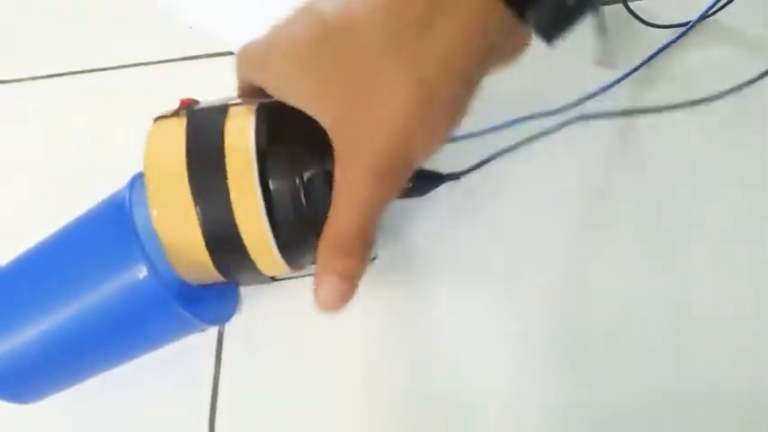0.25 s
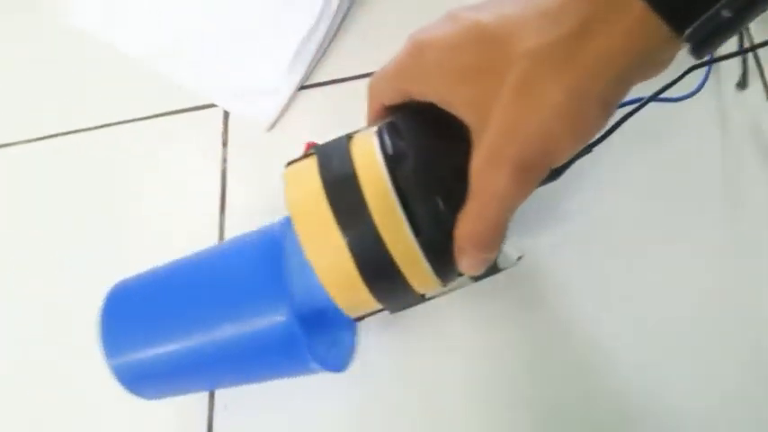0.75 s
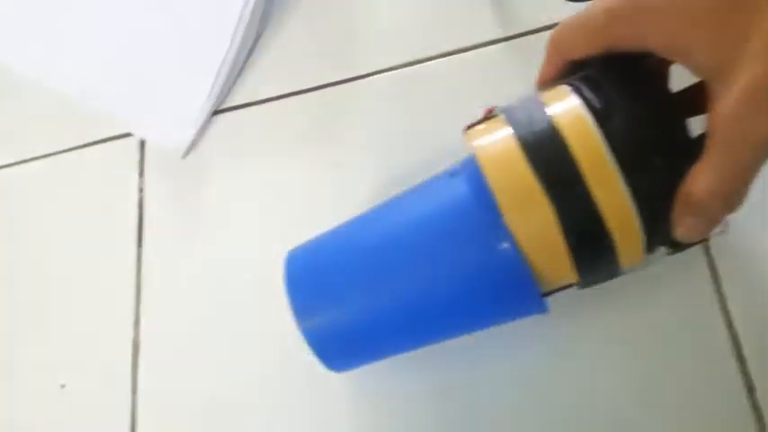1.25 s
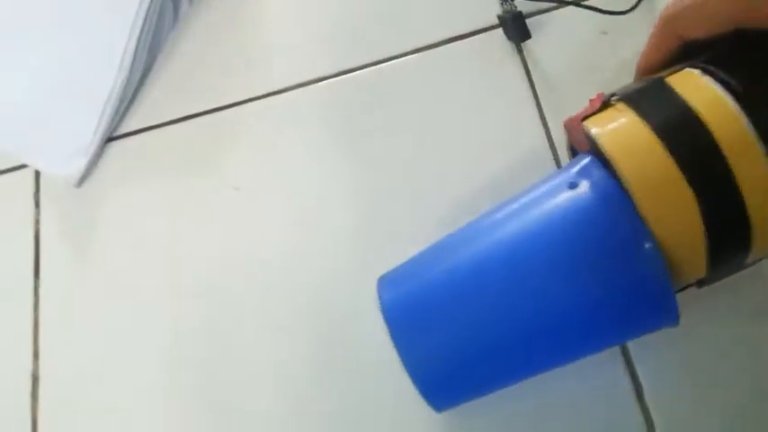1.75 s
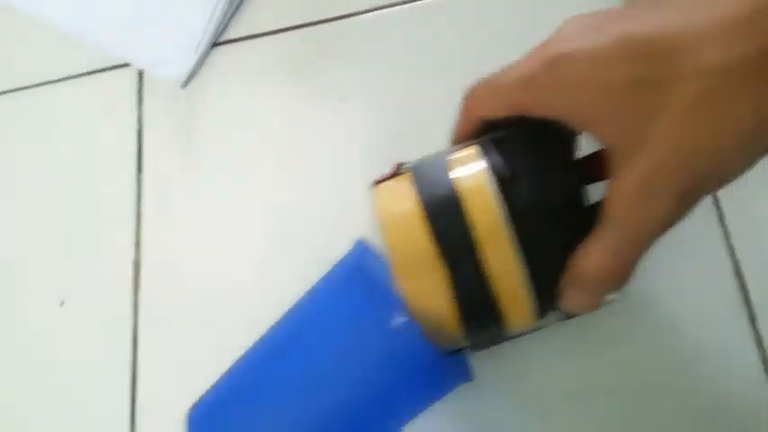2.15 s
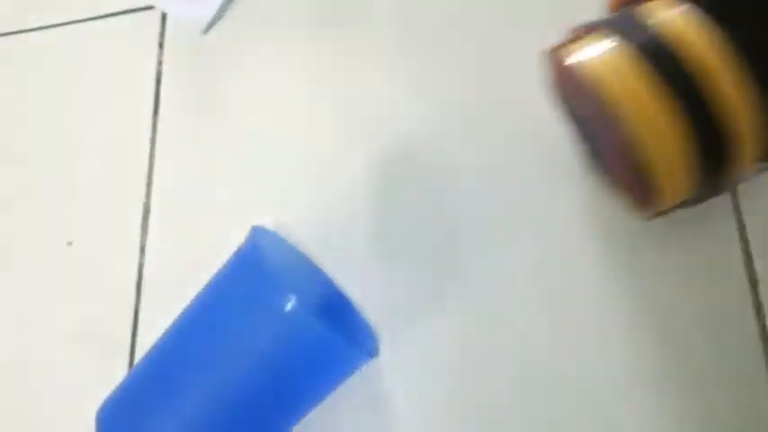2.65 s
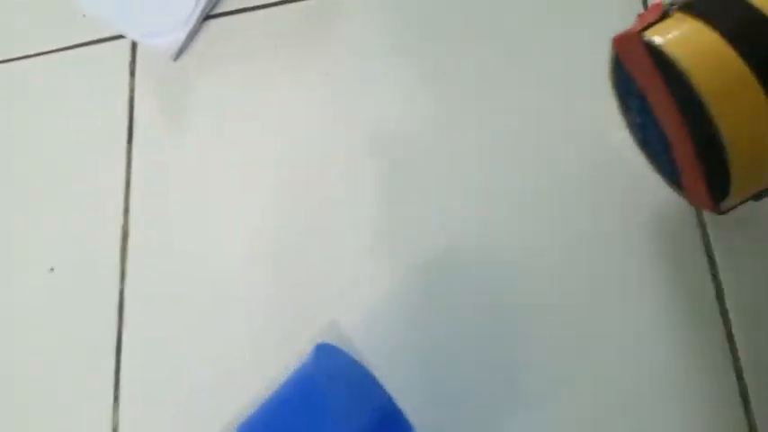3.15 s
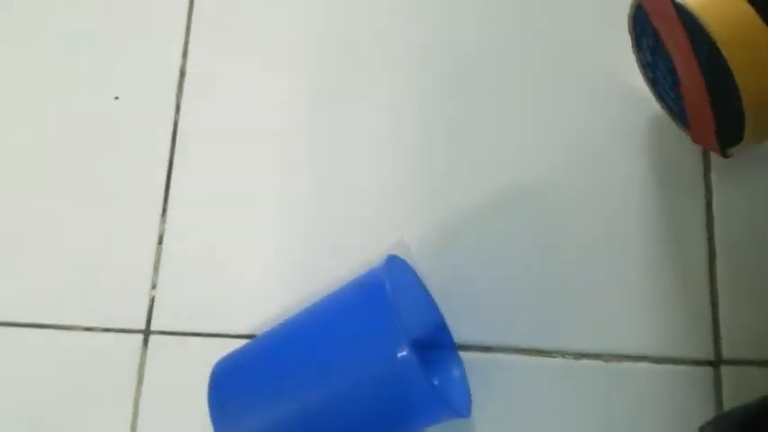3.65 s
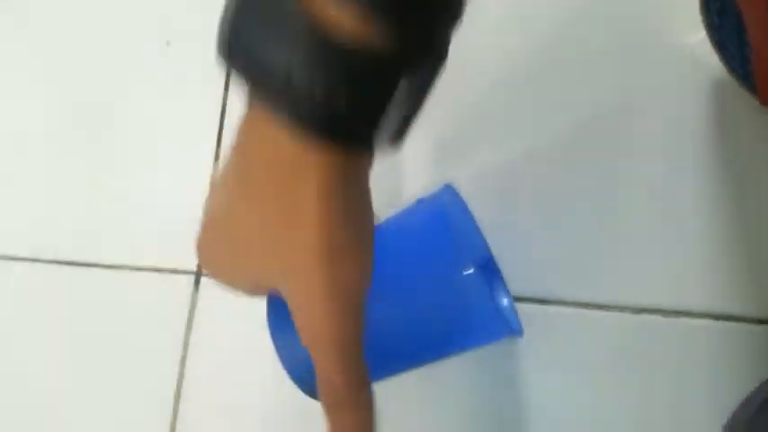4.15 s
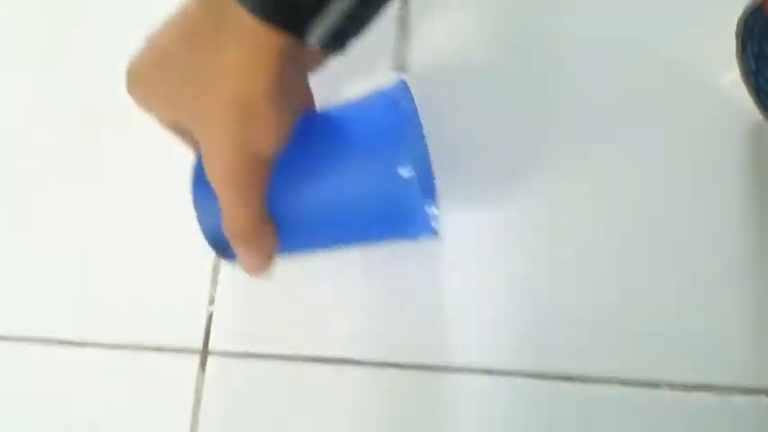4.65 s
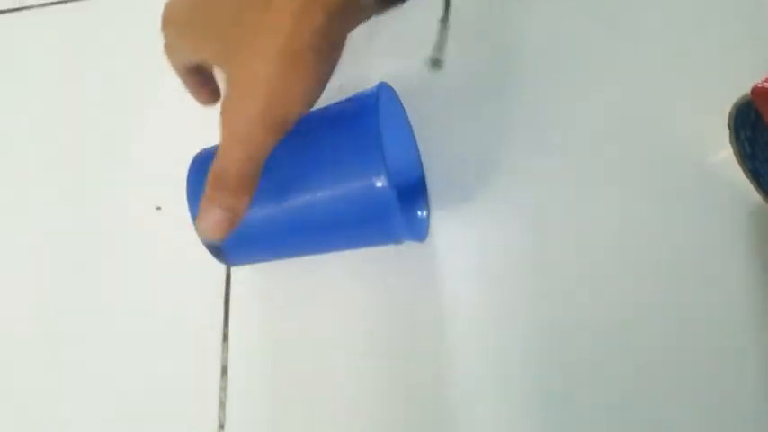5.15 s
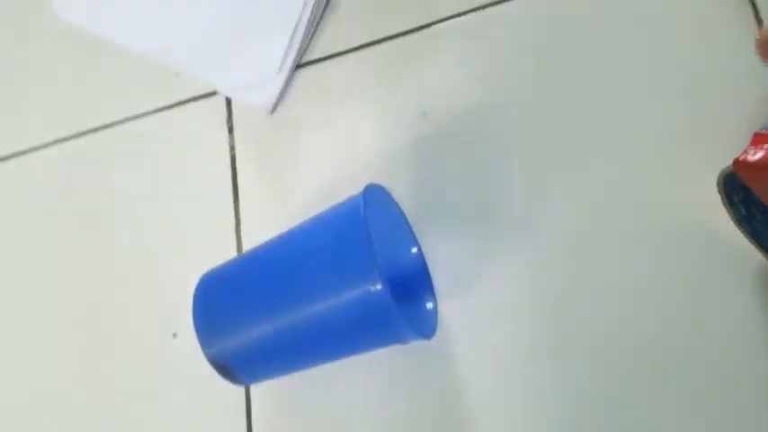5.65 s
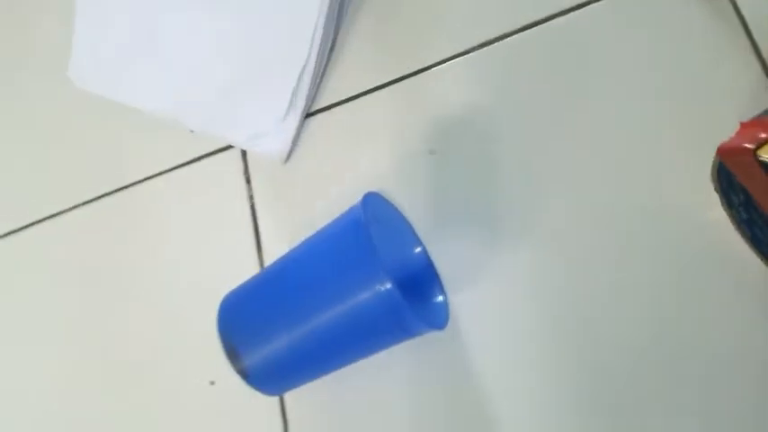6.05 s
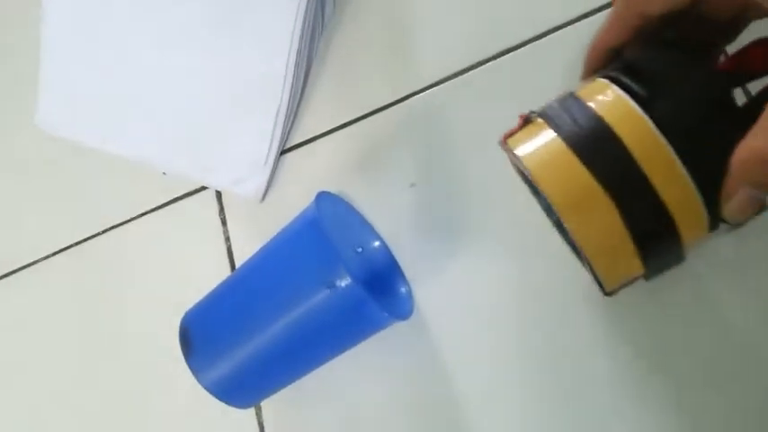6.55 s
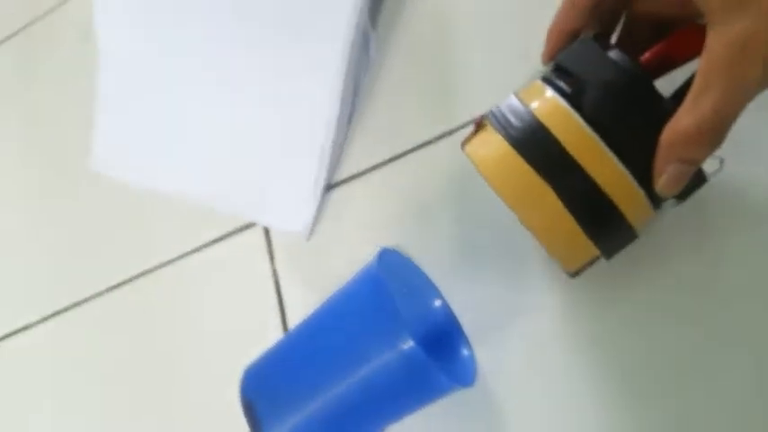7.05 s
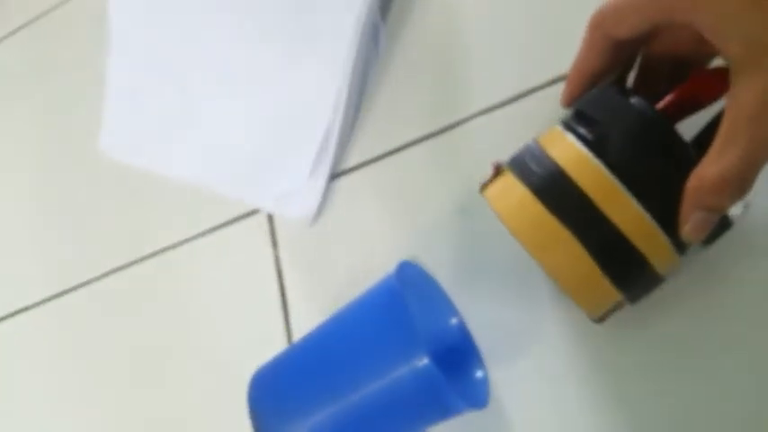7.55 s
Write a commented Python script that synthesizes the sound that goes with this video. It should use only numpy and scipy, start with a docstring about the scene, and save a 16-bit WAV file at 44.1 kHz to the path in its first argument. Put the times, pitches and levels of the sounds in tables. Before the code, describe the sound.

A small electric ducted fan runs very close to a stereo microphone. At first a plastic cup at its mouth makes a loud, rough, hollow double note that swells, dips and distorts into crackling treble. Just before three seconds the notes vanish, leaving fluttering turbulent air with shifting whistly resonances. A tiny bright tick sounds on the right shortly after four seconds. Near the end a strong high whine comes forward, mostly on the right, over a tiled floor.

```python
"""A small ducted fan is swept by hand over a tiled floor, close to a two-port microphone.
It starts with a plastic cup at its mouth: a loud hollow pair of notes that overloads the input into crackling treble.
Just before 3 s the notes die away and leave turbulent air blowing through the resonances of the housing.
A short bright tick follows at 4.25 s, and a strong whine near 3 kHz comes forward on the right after 6.4 s.
Throughout, the resonances swell and fade at each port as fan and microphone turn, and the port delay shifts."""
import sys
import numpy as np
from scipy import signal
from scipy.fft import rfft, irfft, next_fast_len
from scipy.io import wavfile
from scipy.ndimage import uniform_filter1d, minimum_filter1d, map_coordinates

SR = 44100
rng = np.random.default_rng(int(sys.argv[2]) if len(sys.argv) > 2 else 0)


def to_wav(s):
    """Save 16-bit WAV."""
    ch = np.atleast_2d(s).T  # columns
    pcm = np.round(np.clip(ch, -1, 1) * 32767)  # PCM
    wavfile.write(sys.argv[1], SR, pcm.astype(np.int16))


N = 344862

# Table levels set each layer ahead of treble roll-off, puffs, crackle and input overload.
# Lowest housing resonance, moving as the fan leaves the cup and is tilted. Each row: time in seconds,
# left centre in Hz, right centre in Hz, left level in dB, right level in dB, width in Hz.
RUMBLE_TRACK = [(0, 285, 350, -33, -25, 200), (.3, 290, 355, -25.5, -16.5, 200),
                (.7, 290, 326, -25.5, -21.5, 200), (.9, 300, 346, -21.5, -16, 200),
                (1.3, 315, 327, -18.5, -16, 200), (2, 340, 370, -18.5, -14, 220),
                (2.3, 344, 383, -23.5, -16.5, 200), (2.55, 327, 350, -25, -18.5, 200),
                (2.8, 300, 297, -25.5, -23.5, 200), (3.5, 300, 310, -27, -22, 200),
                (4.4, 290, 294, -24.5, -23.5, 161), (5.3, 300, 360, -24.5, -23.5, 221),
                (5.85, 287, 300, -29.5, -24.5, 220), (6.15, 267, 262, -27, -24, 120),
                (6.6, 268, 260, -30, -22, 120), (7, 263, 259, -26, -23.5, 109),
                (7.82, 256, 252, -25, -23.5, 109)]
# Second lowest resonance. Each row: time in seconds, left and right centre in Hz, left and right level in dB.
HOLLOW_TRACK = [(0, 500, 495, -17, -21), (.5, 497, 494, -21, -24), (.65, 487, 494, -37, -39),
                (.95, 496, 473, -13, -18.5), (1.4, 495, 470, -20, -22), (2, 470, 465, -18, -20),
                (2.4, 480, 472, -22, -20), (2.8, 503, 474, -37, -32), (3.4, 460, 437, -30, -36),
                (4.4, 550, 458, -28.5, -29.5), (5.4, 565, 636, -28, -30), (6.1, 656, 690, -26.5, -26),
                (7, 700, 700, -29, -26.5), (7.82, 684, 734, -33, -27.5)]
# The open tube's note, with its top apart at the two ports. Each row: time in seconds,
# left and right centre in Hz, left and right level in dB.
TUBE_TRACK = [(0, 970, 970, -36, -25), (.5, 950, 960, -22, -27), (.75, 990, 960, -27, -32),
              (.95, 955, 910, -22.5, -34), (1.1, 980, 890, -38, -28), (1.5, 990, 860, -41, -17),
              (1.9, 886, 840, -29, -20.5), (2.15, 945, 900, -21, -15), (2.4, 930, 890, -19, -22),
              (2.65, 980, 930, -20, -32), (2.95, 975, 914, -30.5, -22), (3.8, 790, 904, -30, -24.5),
              (4.9, 790, 870, -28.5, -21), (5.5, 925, 885, -27, -26), (5.9, 960, 860, -24, -22),
              (6.25, 950, 850, -28.5, -26.5), (6.5, 934, 790, -27.5, -27.5), (7.82, 936, 810, -24.5, -26.5)]
# Body resonance. Each row: time in seconds, centre in Hz, left level in dB, right level in dB.
BODY_TRACK = [(0, 1540, -29.5, -34), (1.4, 1494, -31, -27.5), (2, 1450, -29, -21), (2.5, 1170, -22, -33),
              (2.9, 1490, -29.5, -28), (3.3, 1380, -25.5, -27.5), (3.8, 1450, -27, -30),
              (4.1, 1400, -25, -24.5), (4.6, 1410, -23, -25), (5.2, 1360, -22.5, -22),
              (5.7, 1620, -24.5, -23.5), (6.3, 1220, -29.5, -32.5), (7.82, 1310, -25, -28)]
# Duct resonance. Each row: time in seconds, centre in Hz, left level in dB, right level in dB.
DUCT_TRACK = [(0.0, 2030, -26.0, -36), (0.33, 1780, -20.5, -19), (0.57, 2020, -33, -34),
              (0.93, 1800, -28, -24.5), (1.29, 1890, -30, -22.5), (1.65, 1950, -28, -30),
              (2.22, 2050, -32.5, -23.5), (2.46, 1900, -36, -38), (2.76, 1990, -28, -17.5),
              (2.97, 2070, -31, -29.5), (3.24, 2010, -35, -20.5), (3.4, 1930, -29, -23),
              (3.54, 1830, -28, -23.5), (3.81, 1720, -32, -22), (3.97, 1800, -36, -28),
              (4.12, 1820, -41, -21.5), (4.4, 1810, -32, -24.5), (4.7, 1710, -27, -21.5),
              (4.95, 1930, -32, -25), (5.15, 1940, -32, -23.5), (5.3, 1830, -26, -24),
              (5.48, 1940, -32, -16.5), (5.62, 1780, -33, -27), (5.79, 1980, -21, -13.5),
              (5.92, 2000, -23, -18), (6.2, 1950, -25, -15.5), (6.4, 1990, -24, -15.5),
              (6.52, 1910, -25, -21), (6.7, 2000, -26, -21), (6.95, 1960, -26, -22),
              (7.8, 1980, -30, -26.5)]
# Throat resonance. Each row: time in seconds, centre in Hz, left level in dB, right level in dB.
THROAT_TRACK = [(0.0, 2270.0, -36, -25), (0.21, 2390, -36, -38), (0.45, 2710, -22, -27.5),
                (0.78, 2430, -42, -26), (1.0, 2600, -34, -19.5), (1.23, 2620, -27.5, -24),
                (1.36, 2600, -25, -22), (1.5, 2610, -26, -18), (1.71, 2300.0, -26.5, -28),
                (2.07, 2480, -25, -18), (2.46, 2280, -26.5, -32), (2.67, 2580, -25, -27),
                (2.97, 2500, -36, -27), (3.27, 2190, -29.5, -20.5), (3.5, 2300, -31, -24.5),
                (3.7, 2600, -29, -21.5), (3.9, 2740, -31, -21.5), (4.08, 2650, -31, -27),
                (4.32, 2420, -34, -39), (4.47, 2300, -32.0, -30), (4.74, 2620, -29, -30.5),
                (4.95, 2650, -38, -23), (5.2, 2550, -28, -23.5), (5.38, 2440, -30, -21),
                (5.5, 2430, -25, -19), (5.62, 2420, -29, -20.5), (5.75, 2420, -28, -18.5),
                (5.9, 2300, -32, -21.5), (6.02, 2300, -36, -16.5), (6.18, 2270, -38, -15),
                (6.39, 2030, -21, -18.5), (6.57, 2230, -29, -25), (6.75, 2270, -28, -22.5),
                (7.8, 2430, -22, -18.5)]
# Whining resonance near 3 kHz. Each row: time in seconds, left and right centre in Hz,
# left and right level in dB, width in Hz.
WHINE_TRACK = [(0, 2900, 2850, -28, -38, 393), (.15, 2900, 2900, -29.5, -31, 350),
               (.33, 2940, 2870, -26, -19.5, 320), (.51, 2930, 2880, -31, -26.5, 300),
               (.72, 2900, 3020, -26, -18.5, 200), (.93, 2870, 2970, -22, -25.5, 350),
               (1.12, 2920, 2820, -28, -16.5, 375), (1.22, 2920, 2720, -21, -9.5, 450),
               (1.3, 2980, 2920, -25, -7.5, 280), (1.45, 3070, 2890, -31, -11.5, 260),
               (1.59, 3070, 2880, -29, -20, 260), (1.83, 3320, 2980, -26, -22.5, 300),
               (2.07, 2900, 2910, -30, -18, 340), (2.22, 2840, 2870, -29, -17.5, 320),
               (2.49, 3100, 2850, -26, -19.5, 300), (2.76, 3100, 2860, -29, -12.5, 340),
               (3.06, 3100, 2970, -26, -23, 380), (3.36, 3080, 2980, -31, -18, 240),
               (3.63, 3100, 2880, -26, -16, 280), (3.84, 2900, 2820, -48, -20, 380),
               (4.02, 2870, 2880, -43, -13, 220), (4.35, 3010, 2900, -40, -20.5, 193),
               (4.53, 3070, 2930, -30, -15.5, 190), (4.68, 2930, 2930, -40, -26, 220),
               (5.0, 3000, 2800, -34, -19.5, 280), (5.25, 2890, 2800, -37, -18, 350),
               (5.4, 2830, 2740, -27, -21, 400), (5.47, 2840, 2660, -23, -16, 420),
               (5.58, 2830, 2720, -23, -14, 380), (5.7, 2920, 2760, -21.5, -21, 300),
               (5.85, 2830, 2820, -25, -26, 300), (6, 2830, 2830, -25, -28, 400),
               (6.15, 2830, 2850, -30, -40, 400), (6.29, 3060, 3040, -26, -18, 300),
               (6.41, 3150, 3070, -29, -21.5, 340), (6.5, 3170, 3130, -20, -12.5, 400),
               (6.6, 3150, 3080, -21, -15, 400), (6.75, 3130, 3035, -21, -11.5, 395),
               (7.17, 3050, 2990, -18.5, -10.5, 330), (7.35, 3010, 2950, -20, -12.5, 307),
               (7.8, 3000, 2930, -22, -14, 282)]
# Rim resonance. Each row: time in seconds, centre in Hz, left level in dB, right level in dB.
RIM_TRACK = [(0, 3700, -35, -28), (.6, 3550, -29.5, -27), (.92, 4040, -28, -21.5), (1.1, 4230, -34, -26),
             (1.35, 4250, -38, -27.5), (1.6, 3120, -24, -28.5), (2.2, 4130, -32, -26.5),
             (2.65, 3750, -37, -23.5), (3, 3850, -30, -40), (3.6, 3830, -35.5, -34),
             (4.4, 4000, -33.5, -35.5), (5.3, 3900, -29, -26), (5.6, 4000, -33, -29.5),
             (6.15, 4000, -30.5, -41), (6.5, 3100, -32, -31.5), (7.82, 3130, -31, -25)]
# Grille resonance. Each row: time in seconds, centre in Hz, left level in dB, right level in dB.
GRILLE_TRACK = [(0.0, 4380, -32, -34), (0.33, 4380, -32.5, -25), (0.54, 4740, -34, -40),
                (0.66, 4920, -34, -23.5), (0.8, 4900, -31, -19), (0.9, 4700, -31, -27),
                (1.02, 4370, -32.0, -34), (1.12, 4650, -37, -25), (1.26, 4700, -34, -23),
                (1.47, 4440, -35.5, -32.5), (1.8, 4960, -44, -28.5), (1.95, 5040, -40, -34),
                (2.22, 4530, -29, -30), (3.09, 4510, -34.5, -32.5), (3.81, 4430, -38, -32),
                (4.2, 4700, -43, -18), (4.5, 4710, -31, -24.5), (4.68, 4600, -49, -23.5),
                (4.86, 4560, -29, -34), (5.07, 4760, -31, -36), (5.43, 4350, -36.0, -42),
                (5.67, 4400, -52, -34), (6.38, 4260, -31, -29.5), (6.5, 4600, -31, -24),
                (6.66, 4500, -26, -23.5), (6.99, 4570, -27, -18.5), (7.56, 4590, -33, -23.5),
                (7.8, 4600, -33.0, -23.5)]
# Close pair of high modes. Each row: time in seconds, lower mode's left and right level in dB,
# upper mode's left and right level in dB.
EDGE_TRACK = [(0.0, -45, -54, -45.0, -23.5), (0.39, -35, -23, -40.5, -29.5), (0.66, -48, -39, -55, -39),
              (0.93, -32, -27, -47, -47), (1.14, -47, -46, -40, -38.0), (1.35, -39, -33, -40.5, -33),
              (1.62, -38, -39.0, -46, -38), (2.28, -35, -44, -46, -34.0), (2.49, -34.0, -22.5, -52, -31),
              (2.73, -40, -37, -36, -35), (2.88, -36, -25.5, -32, -30), (3.09, -28, -33, -40, -35),
              (3.3, -32, -30, -40, -27.5), (3.62, -34, -37, -36, -30.5), (3.93, -36, -40, -41, -34),
              (4.32, -39, -25, -34.5, -24), (4.71, -45, -29, -36, -28.5), (5.01, -34, -31, -40, -29.0),
              (5.3, -31, -26, -40, -30), (5.55, -31, -28, -39, -32), (5.73, -34, -27, -44, -31.5),
              (6.09, -34, -39, -44, -37), (6.39, -35, -29, -39.5, -32.5), (6.66, -39.5, -50, -37, -37),
              (7.8, -36, -40, -48, -33.5)]
# The cup's two notes. Each row: time in seconds, low note in Hz, low note's left and right level in dB,
# high note's left and right level in dB.
CUP_TRACK = [(0, 686, -15, -22, -23, -15), (.07, 680, -15, -17, -15, -14.5),
             (.16, 660, -14, -13, -12.5, -11), (.3, 676, -8.5, -7, -11, -15),
             (.4, 710, -14, -11, -8, -10.5), (.52, 700, -20, -14.5, -14, -15),
             (.6, 660, -31, -33, -21, -21), (.72, 640, -50, -45, -31, -30), (.8, 600, -21, -18, -24, -20.5),
             (.88, 600, -20, -18, -11, -11.5), (1.0, 597, -17, -15, -12.5, -9),
             (1.09, 585, -14.5, -14, -25, -21), (1.25, 630, -12.5, -8.5, -24, -16),
             (1.4, 636, -9, -6, -17, -10.5), (1.6, 660, -9.5, -8.5, -19, -21),
             (1.85, 595, -5, -6, -17.5, -10), (2.0, 574, -6, -8, -12, -10),
             (2.12, 600, -4.5, -4.5, -25, -10.5), (2.28, 656, -11, -10.5, -14, -10.5),
             (2.4, 646, -19, -16, -6, -7.5), (2.54, 600, -13, -14, -19, -11),
             (2.66, 597, -19.5, -24.5, -32, -19), (2.82, 625, -50, -46, -50, -48),
             (3.05, 620, -51, -51, -65, -44)]
# Delay of the right port behind the left. Each row: time in seconds, lag in microseconds (negative: earlier).
PORT_LAG = [(0, 168), (.45, 155), (1, 107), (1.4, 28), (1.8, -1), (2.05, 18), (2.45, 159), (2.9, -51),
            (4.5, -48), (5.2, -66), (5.7, -25), (6.2, -2), (6.7, 50), (7.82, 48)]
# Broad rush of air. Each row: time in seconds, left level in dB, right level in dB.
RUSH_LEVELS = [(0, -28, -28), (1.1, -34.5, -31.5), (1.8, -30.5, -23.5), (2.6, -27.5, -28.5),
               (3, -34, -30.5), (3.8, -28, -27), (4.6, -28.5, -28), (5.3, -31, -28.5), (6, -28, -27.5),
               (6.6, -26.5, -28), (7.3, -25.5, -26), (7.82, -26, -25)]
# Colour of the rush. Each row: frequency in Hz, relative level in dB per Hz.
RUSH_SPECTRUM = [(20, -20), (40, -2), (60, 0), (110, 6.5), (200, -1.5), (500, -2.5), (1500, -54),
                 (3500, -39), (6000, -18)]
# Likeness of the rush at the two ports. Each row: frequency in Hz, correlation from 0 to 1.
RUSH_ALIKE = [(100, 0.94), (1000, 0.17), (4000, 0.12)]
# Steep treble fall of the roar. Each row: frequency in Hz, gain in dB.
ROAR_ROLLOFF = [(20, -1), (5900, -0.45), (6300, -2), (6700, -11.5), (7500, -61), (16000, -43)]
# Treble of the overloaded input. Each row: time in seconds, left level in dB, right level in dB.
OVERLOAD_LEVELS = [(0.8, -77, -68), (0.88, -47, -40), (1.05, -62, -48), (1.11, -69, -73), (1.16, -56, -38),
                   (1.45, -49, -34), (1.6, -44, -39), (2.0, -43, -39), (2.1, -58, -35.5),
                   (2.42, -69, -37.5), (2.55, -70, -65), (2.7, -80, -78)]
# Colour of the overload treble. Each row: frequency in Hz, relative level in dB.
OVERLOAD_SPECTRUM = [(5500, -28), (6600, 6.0), (10000, -0.5), (15000, -6.0), (15300, -34)]
# Fine hiss of the jet. Each row: time in seconds, left level in dB.
HISS_LEVELS = [(0, -55.5), (.37, -46), (.9, -54), (1.5, -45), (2.6, -45), (3, -41), (5.2, -40.5),
               (5.95, -46.5), (6.4, -43.5), (7.82, -46)]
# Colour of the hiss. Each row: frequency in Hz, relative level in dB.
HISS_SPECTRUM = [(7300, -21.5), (7900, -3.0), (10600, -7.5), (11500, -15.0), (15000, -22.0), (15500, -30)]
# Short bright tick. Each row: start in seconds, right level in dB.
TICK_EVENTS = [(4.2503, -8)]

SIZE = 2048  # samples in a short-time spectrum
HZ = np.fft.rfftfreq(SIZE, 1 / SR)[:, None]
FRAMES = np.arange(-(-N // (SIZE // 2)) + 1) * (SIZE // 2) / SR  # frame times in seconds
EDGE_LOW_HZ, EDGE_HIGH_HZ, CUP_HIGH_HZ = 5484, 5974, 743
ONSET_S = 0.0015  # soft start of a puff and of the tick
PUFFS_PER_S, PUFF_DB, PUFF_FADE_S = 70, 0.82, 0.0079  # rate, typical swing, decay time constant
SPRAY_S, SPRAY_POWER = 0.003, 1.7  # the overload treble follows the roar's size over this time, steeply
CRACKLE_DB, CRACKLE_PER_S = 0.5, 450  # depth and speed of the overload's crackle
TICK_HZ, TICK_T60_S, TICK_LEFT_DB = (4970, 5800), 0.061, -35  # left level is relative to the right
CEILING, LIMIT_S = 1.08, 0.00041  # the limiter's aim and time
SATURATION, HARDNESS, TOP_HZ = 1, 13, 15692  # where the input saturates, how abruptly, and its top frequency


def amp(db):
    """Turn dB into gain."""
    return 10 ** (np.asarray(db) / 20)


def along(points, hz):
    """Draw a curve through (Hz, value) points on a log frequency axis."""
    f, v = np.transpose(points)
    return np.interp(np.log(hz + 1), np.log(f + 1), v)


def curves(rows):
    """Glide each column after the time through its rows, one value per frame."""
    s, *cols = np.transpose(rows)
    return [np.interp(FRAMES, s, c) for c in cols]


def filtered(x, response):
    """Shape x by a response of frequency."""
    m = next_fast_len(N + SIZE)
    return irfft(rfft(x, m) * response(np.fft.rfftfreq(m, 1 / SR)), m)[..., :N]


def wave(spectra):
    """Turn short-time spectra back into sound."""
    return signal.istft(spectra, nperseg=SIZE)[1][:, :N]


def air(shape, alike, turn, patchy_db):
    """Turbulent noise as spectra at both ports, level-matched before patches of random gain."""
    a, b = signal.stft(rng.standard_normal((2, N)), nperseg=SIZE)[2]
    patches = uniform_filter1d(rng.standard_normal(a.shape), size=5, axis=0)
    patches = uniform_filter1d(patches, size=3, axis=1)
    level = np.sqrt(np.mean(shape ** 2, axis=-2, keepdims=True))
    gain = shape / level * amp(patchy_db * patches / patches.std())
    # mixing two noises at this angle sets how alike the ports are
    u = np.arccos(np.clip(alike, 0, 1)) / 2
    left = np.cos(u) * a + np.sin(u) * b
    right = np.cos(u) * a - np.sin(u) * b
    # path difference, plus the mode's own phase in radians
    lag = np.exp(-1j * (2 * np.pi * HZ * curves(PORT_LAG)[0] / 10 ** 6 + turn))
    return gain * np.array([left, lag * right])


def resonance(track, width_hz, alike, turn, patchy_db):
    """Air noise through one resonance, applied twice for steep flanks; its centre may differ by port."""
    *centres, left_db, right_db = np.broadcast_arrays(*track)
    centre = np.array(centres)[:, None]
    damping = (HZ * width_hz) ** 2
    shape = damping / ((centre ** 2 - HZ ** 2) ** 2 + damping)
    return amp([left_db, right_db])[:, None] * air(shape, alike, turn, patchy_db)


def housing():
    """Turbulence excites the fan's tube, blades and grille; the ports agree least on the highest modes."""
    *rumble, rumble_width = curves(RUMBLE_TRACK)
    *whine, whine_width = curves(WHINE_TRACK)
    edge_db = curves(EDGE_TRACK)
    edge_low, edge_high = [EDGE_LOW_HZ, *edge_db[:2]], [EDGE_HIGH_HZ, *edge_db[2:]]
    return (resonance(rumble, width_hz=rumble_width, alike=0.95, turn=-0.31, patchy_db=3.0)
            + resonance(curves(HOLLOW_TRACK), width_hz=276, alike=0.73, turn=0.1, patchy_db=4.0)
            + resonance(curves(TUBE_TRACK), width_hz=222, alike=0.35, turn=-0.12, patchy_db=2.5)
            + resonance(curves(BODY_TRACK), width_hz=570, alike=0.65, turn=0.9, patchy_db=3.5)
            + resonance(curves(DUCT_TRACK), width_hz=400, alike=0.62, turn=-1.33, patchy_db=3.0)
            + resonance(curves(THROAT_TRACK), width_hz=510, alike=0.89, turn=-0.59, patchy_db=4.0)
            + resonance(whine, width_hz=whine_width, alike=1.0, turn=0.17, patchy_db=2.5)
            + resonance(curves(RIM_TRACK), width_hz=1370, alike=0.19, turn=0.29, patchy_db=3.5)
            + resonance(curves(GRILLE_TRACK), width_hz=520, alike=0.26, turn=0.92, patchy_db=3.0)
            + resonance(edge_low, width_hz=770, alike=0.065, turn=0.2, patchy_db=3.5)
            + resonance(edge_high, width_hz=860, alike=0.079, turn=0.16, patchy_db=3.5))


def cup():
    """The cup's air, blown like a bottle while it sits at the fan's mouth, sounds a close pair of notes."""
    low_hz, *levels_db = curves(CUP_TRACK)
    low, high = [low_hz, *levels_db[:2]], [CUP_HIGH_HZ, *levels_db[2:]]
    return (resonance(low, width_hz=88, alike=0.97, turn=-0.28, patchy_db=1.5)
            + resonance(high, width_hz=113, alike=1.0, turn=0.61, patchy_db=1.2))


def puffs():
    """Eddies leave the blades at random: the roar's gain jumps up and sinks back."""
    kicks = (rng.random(N) < PUFFS_PER_S / SR) * rng.random(N)
    kicks = uniform_filter1d(kicks, size=round(ONSET_S * SR))
    swell = signal.lfilter([1], [1, -np.exp(-1 / (PUFF_FADE_S * SR))], kicks)
    return amp(PUFF_DB * (swell - swell.mean()) / swell.std())


def crackle_gain(roar):
    """Crackling gain that rides the roar's peaks, evened out to its usual size over a quarter second."""
    peaks = np.abs(uniform_filter1d(roar ** 2, size=round(SPRAY_S * SR))) ** (SPRAY_POWER / 2)
    knots = rng.standard_normal(1000 * N // SR)
    crackle = map_coordinates(knots, [np.arange(N) * CRACKLE_PER_S / SR])
    spray = peaks * amp(CRACKLE_DB * crackle)
    usual = np.sqrt(np.abs(uniform_filter1d(spray ** 2, size=SR // 4))) + 1e-9
    return spray / usual


def overload_treble(roar):
    """Treble noise stands in for the clipping input, mostly at the right port during the loud cup notes."""
    shape = amp(along(OVERLOAD_SPECTRUM, HZ))
    noise = amp(curves(OVERLOAD_LEVELS))[:, None] * air(shape, alike=0.05, turn=0, patchy_db=1)
    return wave(noise) * crackle_gain(roar)


def ticks():
    """Two high tones start softly, beat together and die away in about 60 ms, mostly at the right port."""
    out, t = np.zeros(N), np.arange(SR // 20) / SR
    tones = sum(np.sin(2 * np.pi * hz * t) for hz in TICK_HZ) / 2
    ring = tones * amp(-60 * t / TICK_T60_S) * np.minimum(1, t / ONSET_S)
    for s, db in TICK_EVENTS:
        out[round(s * SR):][:len(t)] += amp(db) * ring
    return amp([[TICK_LEFT_DB], [0]]) * out


def rush():
    """Broad noise of moving air, nearly the same at both ports in the bass."""
    alike = along(RUSH_ALIKE, HZ)
    noise = air(amp(along(RUSH_SPECTRUM, HZ)), alike, turn=-0.28, patchy_db=2.5)
    return amp(curves(RUSH_LEVELS))[:, None] * noise


def hiss():
    """The jet's treble, stronger at the left port and almost unrelated between the ports."""
    ports = amp([[[0]], [[-13]]])
    noise = air(amp(along(HISS_SPECTRUM, HZ)), alike=0.05, turn=0, patchy_db=3.5)
    return amp(curves(HISS_LEVELS)[0]) * ports * noise


def scene():
    """Mix the puffing roar, tick and hiss with the crackling treble of the overloaded input."""
    roar = wave(amp(along(ROAR_ROLLOFF, HZ)) * (housing() + cup() + rush())) * puffs()
    return roar + overload_treble(roar) + ticks() + wave(hiss())


def record(dry):
    """Oppositely wired ports meet a fast but late limiter; the peaks it lets through saturate into treble."""
    x = dry * [[1], [-1]]
    span = round(LIMIT_S * SR)
    needed = np.minimum(1, CEILING / (np.abs(x) + 1e-9))
    held = minimum_filter1d(needed, size=span)
    x = x * uniform_filter1d(held, size=3 * span, origin=span)  # the shift makes the gain late
    x = x / (1 + np.abs(x / SATURATION) ** HARDNESS) ** (1 / HARDNESS)
    return filtered(x, lambda hz: hz < TOP_HZ)


dry = scene()
out = record(dry)
to_wav(out)
```